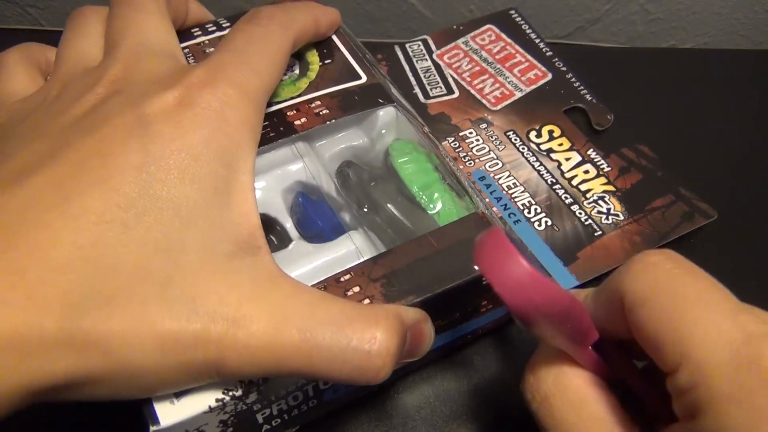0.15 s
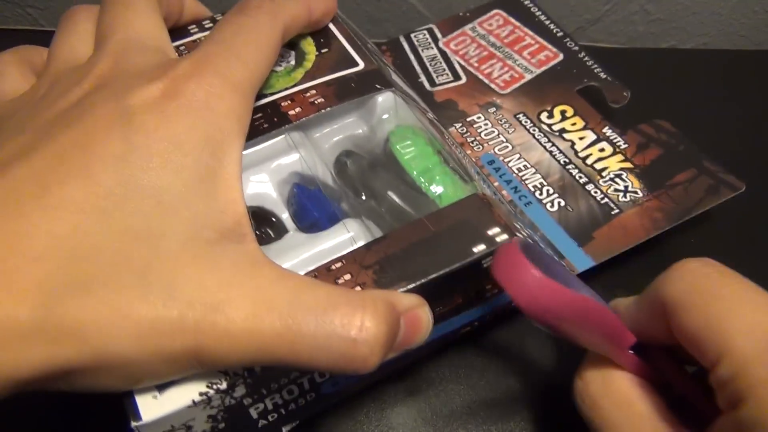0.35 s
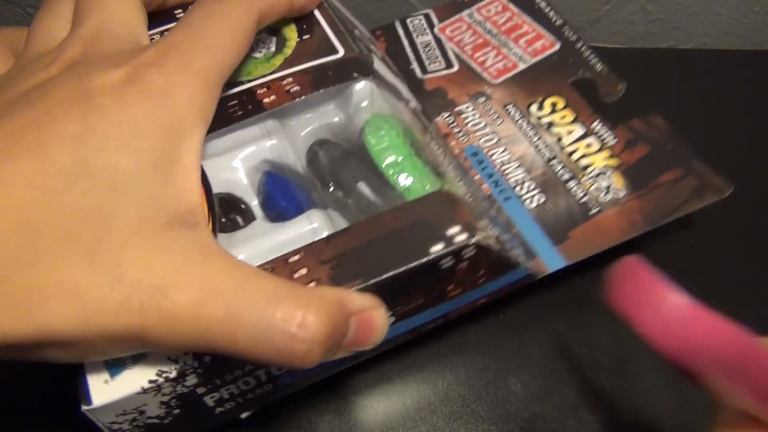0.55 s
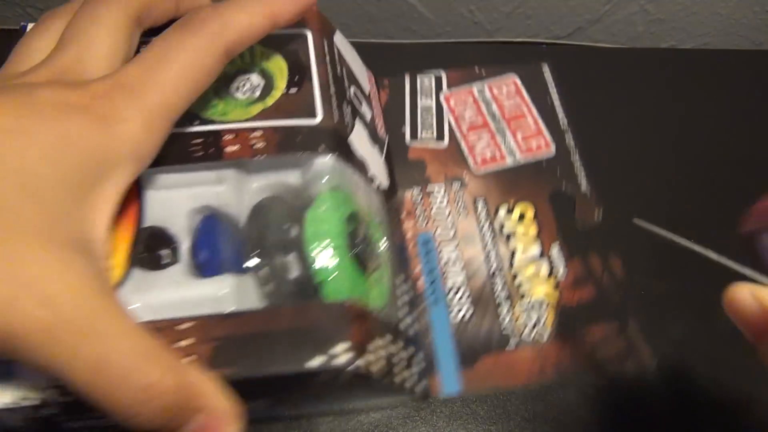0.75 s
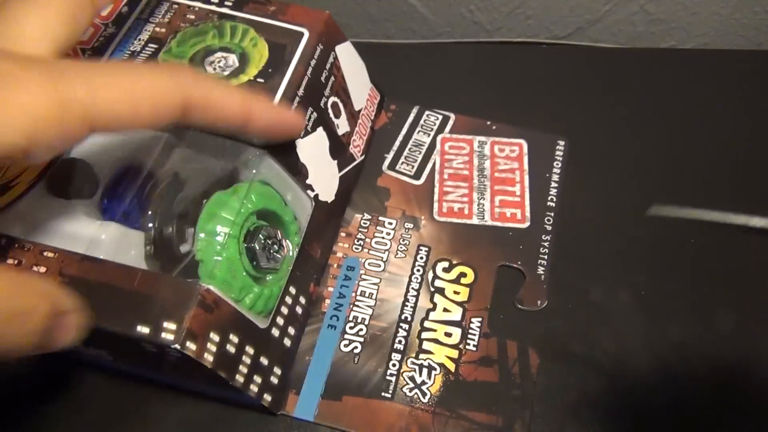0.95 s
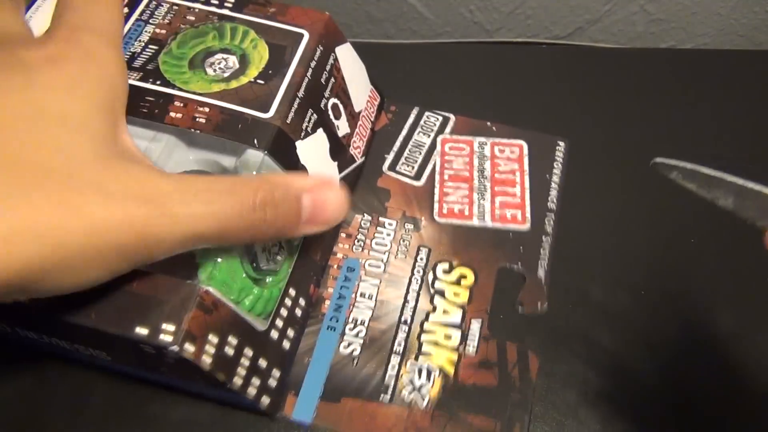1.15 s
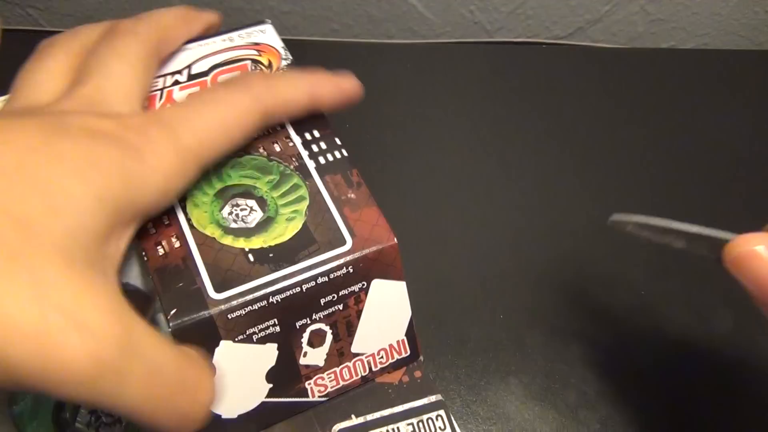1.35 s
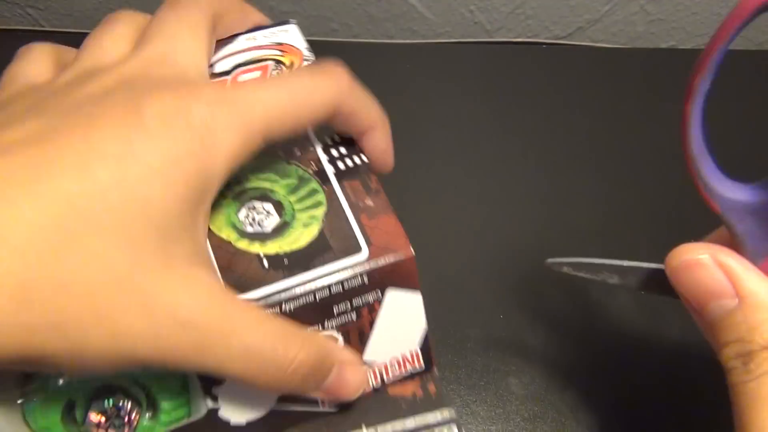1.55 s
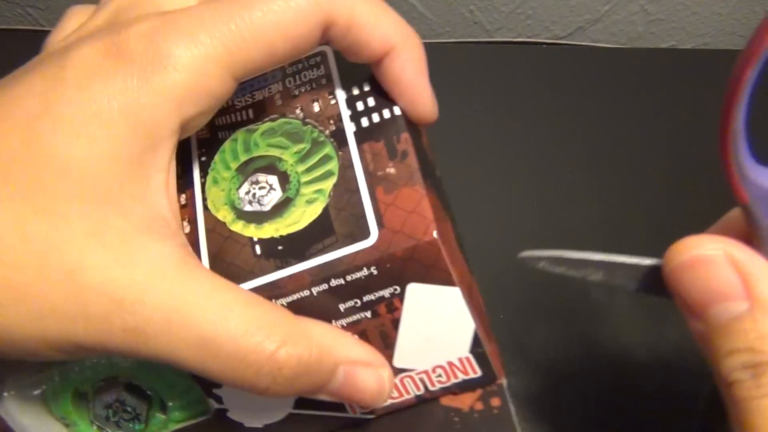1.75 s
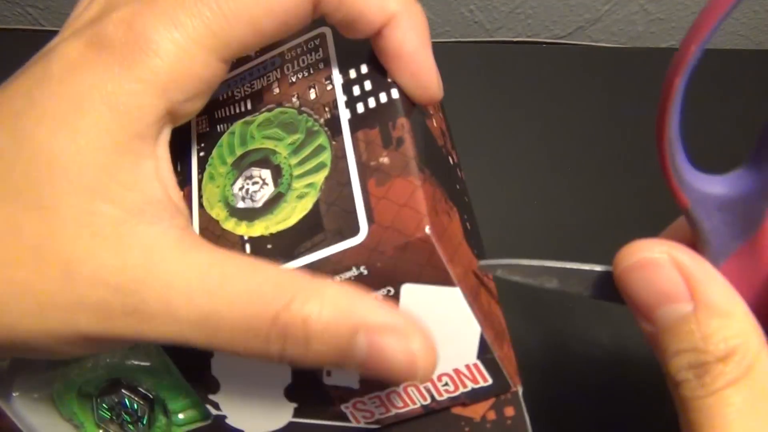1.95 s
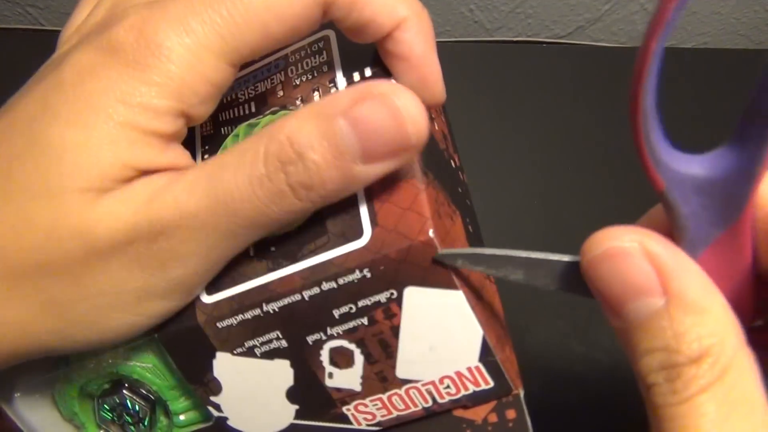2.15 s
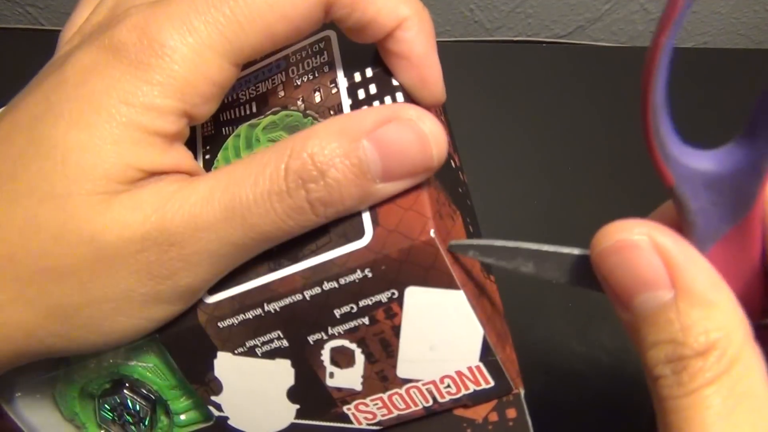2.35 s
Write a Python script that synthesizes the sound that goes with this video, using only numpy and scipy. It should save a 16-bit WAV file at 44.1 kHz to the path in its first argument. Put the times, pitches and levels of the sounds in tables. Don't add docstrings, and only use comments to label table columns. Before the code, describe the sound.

Scissors snip stiff toy packaging with a sharp double crack, then faint rustling, two rough box drags over a desk mat, and small taps and creaks from gripping fingers, caught by a close small stereo camera microphone.

```python
import sys
import numpy as np
from scipy import signal
from scipy.fft import rfft, irfft
from scipy.io import wavfile

SR = 44100
rng = np.random.default_rng(int(sys.argv[2]) if len(sys.argv) > 2 else 0)


def master_out(mix):
    frames = np.transpose(np.atleast_2d(mix))
    ceiling = np.clip(frames, -1, 1)
    pcm = np.round(ceiling * 32767).astype(np.int16)
    wavfile.write(sys.argv[1], SR, pcm)


def voltage_ratio(level):
    return 10 ** (np.asarray(level, float) / 20)


N = 105840

# frequency in Hz, bandwidth in Hz, level in dB.
BOX_MODES = [(304.5, 71, 0), (653.4, 95, 4.5), (1247, 326, 0.5), (1630, 338, 4.5), (2993, 75, -13),
             (4230, 52, -6)]


def rms_one(x):
    return x / np.sqrt(np.mean(x ** 2) + 1e-20)


def at_hz(points, hz):
    point_hz, value = np.array(points).T
    return np.interp(np.log(hz), np.log(point_hz), value)


def drift(rate_hz):
    pole = np.exp(-80 * np.pi * rate_hz / SR)
    noise = rng.standard_normal(N // 40 + 2002)
    slow = signal.lfilter([1], [1, -2 * pole, pole * pole], noise)[2000:]
    return np.interp(np.arange(N) / 40, np.arange(len(slow)), rms_one(slow))


def resonance(x, hz, width_hz):
    r = np.exp(-np.pi * width_hz / SR)
    zeros = [(1 - r * r) / 2, 0, (r * r - 1) / 2]
    poles = [1, -2 * r * np.cos(2 * np.pi * hz / SR), r * r]
    return signal.lfilter(zeros, poles, x + 1e-18)


def grains(per_s, spread_db):
    sizes = voltage_ratio(spread_db * np.minimum(rng.exponential(1, N), 4))
    signs = rng.choice([-1, 1], N)
    return rms_one(sizes * signs * (rng.random(N) < per_s / SR))


def colour(x, spectrum, patchy_db):
    out = 0
    edges = 28.3 * 2 ** np.arange(0, 9.6, 0.5)
    for k, (low, high) in enumerate(zip(edges, edges[1:])):
        hz = np.sqrt(low * high)
        band = signal.sosfilt(signal.butter(2, [low, high], "band", fs=SR, output="sos"), x + 1e-18)
        inside = spectrum[0][0] * 0.8 < hz
        gain = voltage_ratio(at_hz(spectrum, hz) + patchy_db * drift(21.0))
        out = out + inside * (-1) ** k * gain * band
    return rms_one(out)


def box(x, strengths_db):
    out = 0
    for k, ((hz, width_hz, db), extra_db) in enumerate(zip(BOX_MODES, strengths_db)):
        out = out + (-1) ** k * voltage_ratio(db + extra_db) * resonance(x, hz, width_hz)
    return out


def air():
    # frequency in Hz, level in dB per Hz.
    air_spectrum = [(30, 5), (170, 0.5), (830, -0.5), (2100, -11.5), (13500, -17)]
    whine_hz, width_hz = 14500, 250
    whine = resonance(rng.standard_normal(N), whine_hz, width_hz)
    whine = rms_one(resonance(whine, whine_hz, width_hz))
    room = colour(rng.standard_normal(N), air_spectrum, patchy_db=1.5)
    return voltage_ratio(-61.5) * room + voltage_ratio(-76) * whine


def snaps(rows, top_hz):
    size = 4096
    out, t = np.zeros(N + size), np.arange(size) / SR
    click_ms, click_db, burst_ms = 1.2, 18, 2.83
    tail_db, tail_t60_s = -9.5, 0.095
    crack_q, broad_db = 19, -4
    broad = signal.butter(2, [1000, top_hz], "band", fs=SR, output="sos")
    high_mode = np.array(BOX_MODES)[:, 0] > 1000
    for s, db, hz, ring_db in rows:
        noise = rng.standard_normal(size)
        strengths_db = rng.normal(0, 2, len(BOX_MODES)) - 7 * high_mode
        burst = np.minimum(t / 0.00067, 1) * np.exp(-(t * 1000 / burst_ms) ** 2)
        tear = noise * (burst + voltage_ratio(tail_db - 60 * t / tail_t60_s))
        tear[int(click_ms * SR / 1000)] += voltage_ratio(click_db)
        crack = 2 * resonance(tear, hz, hz / crack_q) + voltage_ratio(broad_db) * signal.sosfilt(broad, tear)
        ring = box(tear, strengths_db)
        both = voltage_ratio(-1.5) * crack / abs(crack).max() + voltage_ratio(ring_db - 2.5) * ring / abs(ring).max()
        i = int(s * SR)
        out[i:i + size] += voltage_ratio(db) * both
    return out[:N]


def strokes():
    # time in seconds, hiss level in dB, box shake over the hiss in dB.
    cut = [
        [(0.026, -64.5, 22), (0.045, -60, 13), (0.075, -69, 13.5), (0.1, -90, -6)],
        [(0.209, -41, 0), (0.225, -32.5, 5.5), (0.265, -36.5, 5), (0.285, -42, 7), (0.318, -43.5, 10.5),
         (0.33, -56.5, 16), (0.37, -42.5, 2), (0.412, -52, 5), (0.425, -51.5, 1.5)],
        [(0.435, -54.5, 13), (0.47, -53, 0), (0.5, -62, 18), (0.52, -57.5, 14.5), (0.535, -69, 24.5),
         (0.56, -61.5, 9.5), (0.64, -56, 7), (0.72, -54, 3.5)],
    ]
    drag = [
        [(0.73, -43, -2), (0.757, -32.5, -15), (0.775, -36, -19), (0.81, -32.5, -11.5), (0.87, -35, -3),
         (0.96, -36, -10), (0.985, -51, 9.5), (1.02, -63, 4), (1.05, -69, -7)],
        [(1.117, -57, 8.5), (1.15, -68, 11.4), (1.185, -68.5, 20)],
        [(1.19, -58, 4), (1.22, -34.5, -13), (1.27, -28.5, -21), (1.35, -31.5, -8), (1.385, -34.5, -9.5),
         (1.405, -47, 0.5), (1.44, -57.5, 2.5), (1.47, -52.5, -12)],
    ]
    grip = [
        [(1.465, -63, -11), (1.49, -46, -10.5), (1.524, -54, 5.5), (1.531, -48, 14), (1.565, -38.5, -17),
         (1.6, -33.5, -15), (1.625, -42.5, -4), (1.665, -41, -1), (1.69, -54.5, 5.5), (1.725, -52, 3)],
        [(1.735, -46, 5.1), (1.76, -51.5, 3.1), (1.8, -62.5, 8.4), (1.83, -46, 2), (1.878, -53.5, 10.4)],
        [(1.887, -34, -23), (1.91, -36.5, -5), (1.95, -53, 14), (1.968, -54, 9)],
        [(1.975, -48.5, 1), (2.0, -46.5, -10), (2.04, -49.5, 4.5), (2.07, -50.5, 8.5), (2.11, -48.5, 3.5),
         (2.15, -53.5, 11), (2.165, -74, 11), (2.19, -72, 13)],
        [(2.27, -81, 14), (2.3, -63.5, 15), (2.316, -63, 12.5), (2.33, -84, 7.5)],
    ]
    # time in seconds, panels over cavity in dB.
    hold = [(.2, -3.5), (.4, -4.5), (.7, -3.5), (.9, -0.5), (1.13, -5), (1.25, 6.5), (1.45, 1), (1.6, -2),
            (1.8, -2), (2.15, 0.5)]
    # frequency in Hz, level in dB per Hz.
    rub_spectrum = [(900, -20.5), (1600, -4.5), (2400, -10.5), (3800, -3.5), (7000, -0.5), (9500, -3.5),
                    (12500, -10.5), (16000, -23)]
    shake_spectrum = [(40, -15), (150, -2), (350, -9), (700, -3), (1600, -6.5), (3000, -3), (6000, -15.5)]

    t, hiss, shake = np.arange(N) / SR, np.zeros(N), np.zeros(N)
    for rows in [*cut, *drag, *grip]:
        s, hiss_db, shake_db = np.transpose(rows)
        rise, fall = (t - s[0]) / 0.002 + 1, (s[-1] - t) / 0.011 + 1
        edge = np.clip(np.minimum(rise, fall), 0, 1)
        hiss = np.maximum(hiss, edge * voltage_ratio(np.interp(t, s, hiss_db)))
        shake = np.maximum(shake, edge * voltage_ratio(np.interp(t, s, hiss_db + shake_db)))

    held_db = np.interp(t, *np.transpose(hold)) / 2
    modes_db = [2.5 * drift(15.2) + np.sign(hz - 1000) * held_db for hz, _, _ in BOX_MODES]
    slips = colour(grains(per_s=3500, spread_db=2.8), shake_spectrum, patchy_db=2.2)
    slips = rms_one(slips + voltage_ratio(4.5) * rms_one(box(slips, modes_db)))

    rub = colour(grains(per_s=14000, spread_db=2.5), rub_spectrum, patchy_db=2)
    top = signal.sosfilt(signal.butter(2, 9000, "high", fs=SR, output="sos"), rub)
    brighter = (hiss / voltage_ratio(-54.5)) ** 0.3835 - 1
    return hiss * (rub + brighter * top) + shake * slips


def thumps():
    # start in seconds, peak level in dB, pitch in Hz.
    landings = [(0.224, -13, 334), (0.245, -9.5, 338), (0.311, -32, 262), (0.363, -18.5, 360),
                (0.82, -34, 126), (0.885, -21, 214), (0.962, -22, 140), (0.739, -44.5, 109),
                (1.145, -34.5, 197), (1.19, -32.5, 137.3), (1.331, -32.5, 141), (1.53, -30.5, 201),
                (1.548, -29, 182), (1.7308, -18, 236), (2.259, -34.5, 287)]
    size = 16384
    out, t = np.zeros(N + size), np.arange(size) / SR
    t60_cycles, rumble_db, rumble_t60_s = 5.33, -28, 0.39
    for s, db, hz in landings:
        rumble = resonance(rng.standard_normal(size), hz, hz)
        rumble = rms_one(resonance(rumble, hz, hz))
        tone = voltage_ratio(-60 * t * hz / t60_cycles) * (np.sin(2 * np.pi * hz * t) + rumble / 2)
        linger = voltage_ratio(rumble_db - 60 * t / rumble_t60_s) * rumble
        push = np.minimum(t * hz, 1)
        i = int(s * SR)
        out[i:i + size] += voltage_ratio(db) * push * (tone + linger)
    return signal.sosfilt(signal.butter(2, 60, "high", fs=SR, output="sos"), out[:N])


def creaks():
    # middle in seconds, length in ms, rms
    # level in dB, pitch in Hz.
    panel_slips = [(.229, 19, -28.5, 1150), (.238, 10, -23, 630), (.263, 8, -28, 1250),
                   (.27, 6.4, -47, 700), (0.2934, 4.2, -23.5, 4620), (0.375, 10, -43, 410),
                   (0.411, 10, -41.5, 660), (.445, 16, -44.5, 685), (0.509, 15, -36.5, 3910),
                   (.513, 12, -41, 2930), (.53, 20, -40.5, 660), (.736, 4.5, -49, 600),
                   (.862, 15, -40, 630), (0.887, 6.6, -25.5, 1650), (.901, 5, -36, 2980),
                   (0.97, 10, -40.5, 1130), (.971, 8.1, -38, 513), (1.373, 49, -39.5, 1480),
                   (1.364, 61, -41, 3860), (1.764, 20, -52, 2200), (1.888, 8.4, -32, 590),
                   (1.93, 34, -42, 2180), (1.936, 40, -40, 1330), (1.962, 5, -38, 2050),
                   (2.067, 14, -39.5, 1520), (2.072, 11, -46, 3780), (2.071, 12, -47, 5200),
                   (2.102, 16, -38, 437), (2.123, 13, -40.5, 820), (2.137, 33, -43, 1600),
                   (2.145, 29, -42, 1015), (2.135, 12, -49.5, 5350), (2.315, 7.2, -44, 690),
                   (1.735, 5.9, -32, 480), (1.001, 45, -52, 70), (1.091, 110, -63, 81),
                   (1.549, 36, -46.5, 323), (0.346, 45, -40.5, 380), (2.161, 29, -49.5, 257),
                   (.889, 7, -29.5, 2960), (.235, 33, -40, 157), (1.245, 60, -45.5, 3350)]
    half = 4096
    out, t = np.zeros(N + 2 * half), np.arange(-half, half) / SR
    for s, ms, db, hz in panel_slips:
        tone = rms_one(resonance(rng.standard_normal(2 * half), hz, 110 + hz / 35))
        bell = np.exp(-(2000 * t / ms) ** 2)
        level = voltage_ratio(db) * np.linalg.norm(bell) / np.linalg.norm(bell * tone)
        i = int(s * SR)
        out[i - half:i + half] += level * bell * tone
    return out[:N]


def scene():
    # start in seconds, peak level in dB, crack pitch in Hz, box ring over the crack in dB.
    bright_snaps = [(0.0084, -31, 3700, -23), (0.0253, -25, 3700, -14), (0.0532, -31, 2880, -16),
                    (0.1461, -24, 4700, -5.5), (0.1488, -19, 2600, -7.5), (0.175, -23, 4070, -2.5),
                    (0.2433, -2.5, 2850, -13), (0.2492, -6, 9800, -29), (0.2918, -5.5, 2950, -16),
                    (0.3145, -22, 6740, -19), (0.4439, -32, 2920, -17), (0.4845, -24.5, 3480, -33),
                    (0.5102, -21.5, 4000, -10), (1.1159, -39.5, 9400, -3), (1.1305, -22, 2300, -16),
                    (1.7853, -20, 1300, -4.5), (1.884, -30, 1340, -8), (2.0492, -22, 3870, -5),
                    (2.1995, -36, 1200, 3.5), (2.2538, -18.5, 4370, -9.5)]
    dull_knocks = [(0.2208, -23, 1210, -4), (0.8589, -21, 2870, -5), (0.8856, -12.5, 2930, -2.5),
                   (0.969, -23, 1090, -9), (1.5274, -31, 1460, -26), (1.731, -30, 1190, 4),
                   (1.8178, -25.5, 1220, -7.5), (1.9598, -33, 1590, 10), (2.1021, -20.5, 1630, -45),
                   (2.223, -28.5, 1840, -4)]
    further_snaps = [(0.034, -47, 8000, -12), (0.2085, -28, 700, 7), (0.4079, -29.5, 5930, -26),
                     (0.4575, -29, 5830, -14), (0.464, -36, 5300, -12), (0.5465, -35, 1980, -10),
                     (0.7012, -42, 6500, -31), (0.7291, -27, 1530, 0.5), (1.023, -42, 3300, -20),
                     (1.164, -43, 3300, -16), (1.9495, -37, 1300, 5), (2.007, -23, 1380, -12),
                     (1.8056, -23.5, 1290, 0), (2.0242, -19.5, 1280, -5.5), (2.0971, -29, 1540, 3.5)]
    # frequency in Hz, likeness from 0 to 1.
    likeness = [(100, 1), (500, 0.94), (1500, 0.96), (4000, 0.92), (9000, 0.83), (15000, 0.85)]

    mid = air() + snaps(bright_snaps, top_hz=10400) + strokes() + snaps(further_snaps, top_hz=10400)
    mid = mid + snaps(dull_knocks, top_hz=3700) + thumps() + creaks()

    size, turn = N + 4096, 2 * drift(9.8)
    smear_t60_s = 0.013
    smear = rng.standard_normal((2, 2048)) * voltage_ratio(-60 * np.arange(2048) / SR / smear_t60_s)
    hz = np.maximum(np.fft.rfftfreq(size, 1 / SR), 1)
    alike = np.clip(at_hz(likeness, hz), 0, 1)
    side_gain = np.sqrt((1 - alike) / (1 + alike))
    paths = rfft(smear / np.linalg.norm(smear[0]), size) * side_gain
    one, two = irfft(rfft(mid, size) * paths, size)[:, :N]
    side = np.cos(turn) * one + np.sin(turn) * two
    return np.array([mid + side, mid - side])


def top_cut(x):
    return signal.sosfilt(signal.butter(12, 16710, fs=SR, output="sos"), x)


def record(dry):
    low_pass = signal.ellip(10, 0.5, 35, 15750, fs=SR, output="sos")
    mix = signal.sosfilt(low_pass, dry)
    return top_cut(mix)


dry = scene()
out = record(dry)
master_out(out)
```